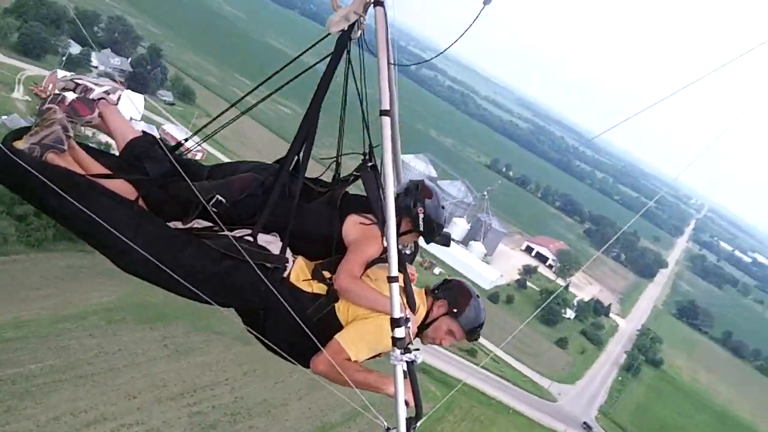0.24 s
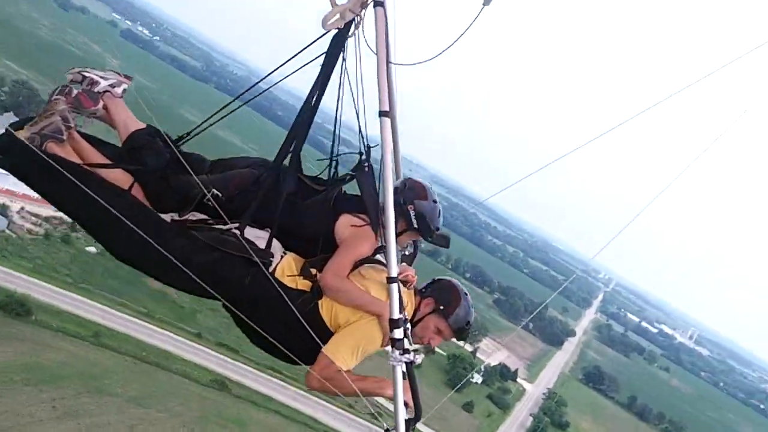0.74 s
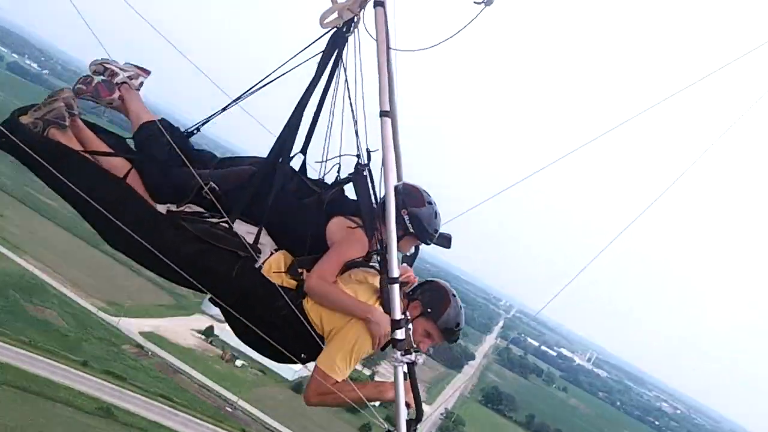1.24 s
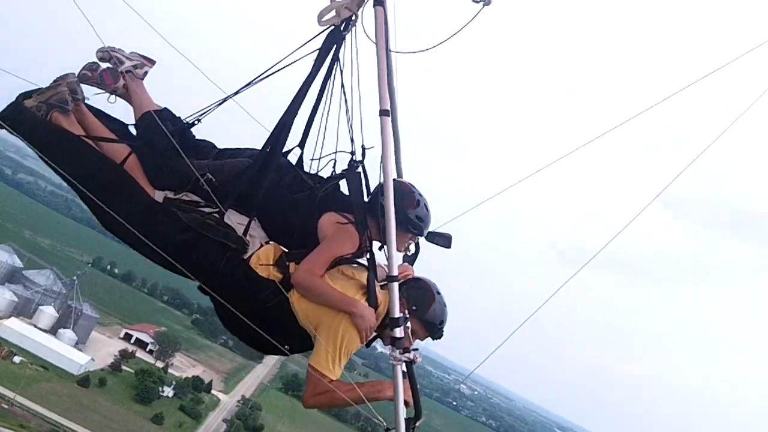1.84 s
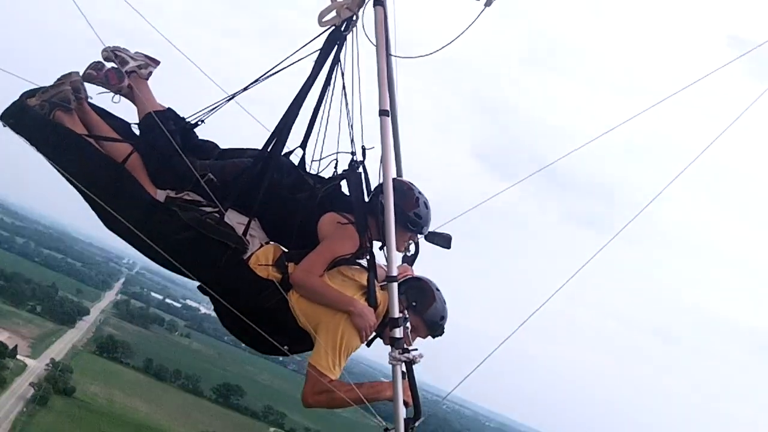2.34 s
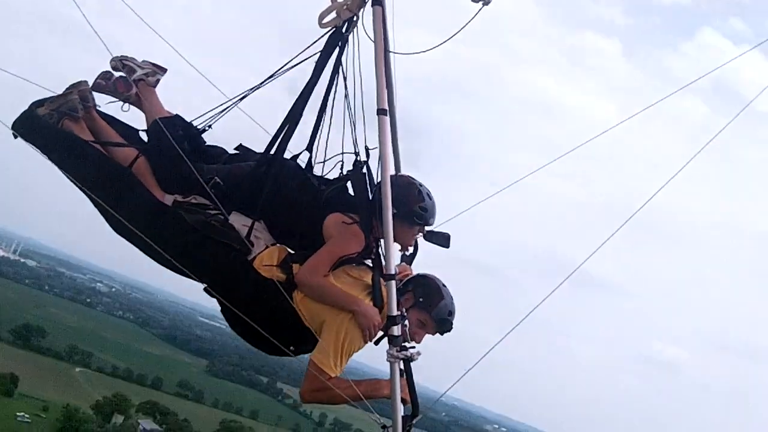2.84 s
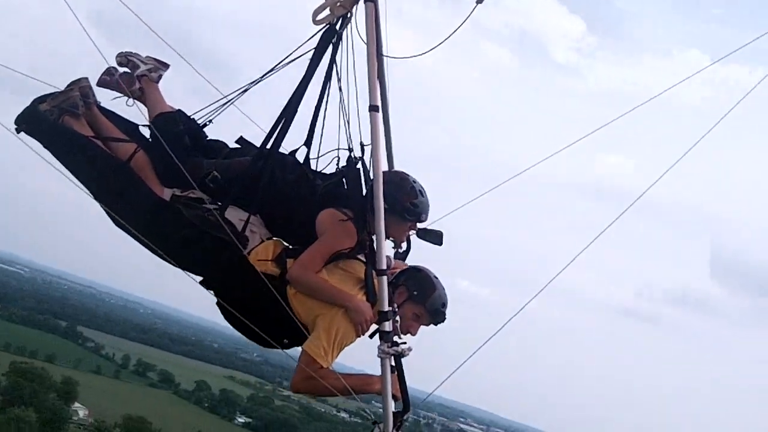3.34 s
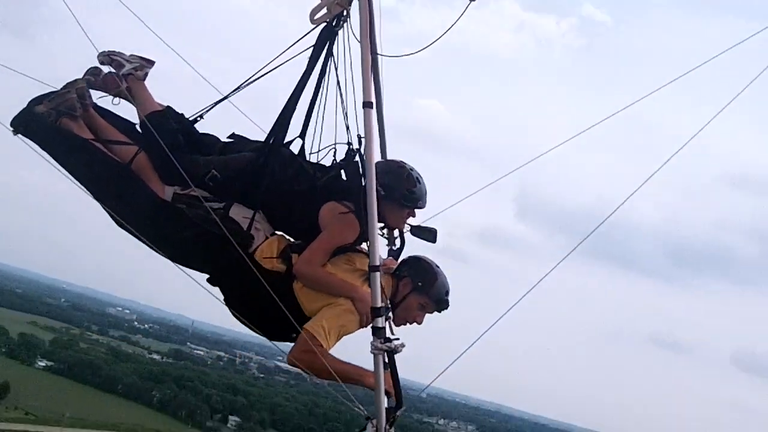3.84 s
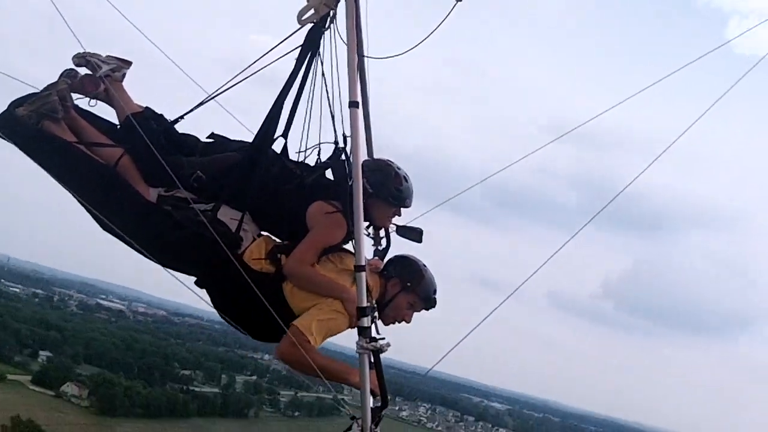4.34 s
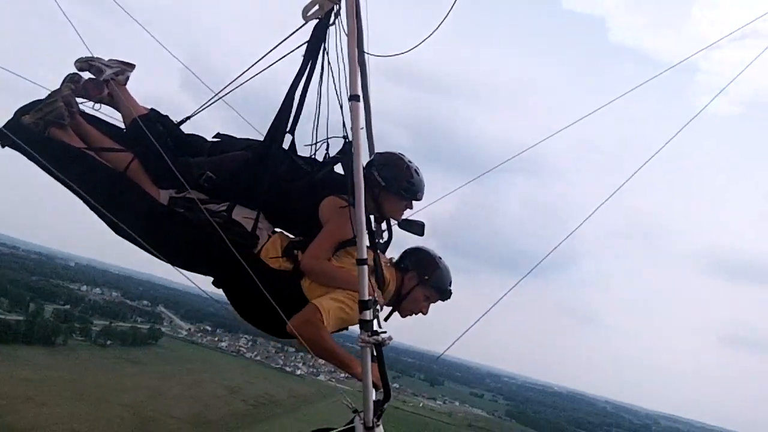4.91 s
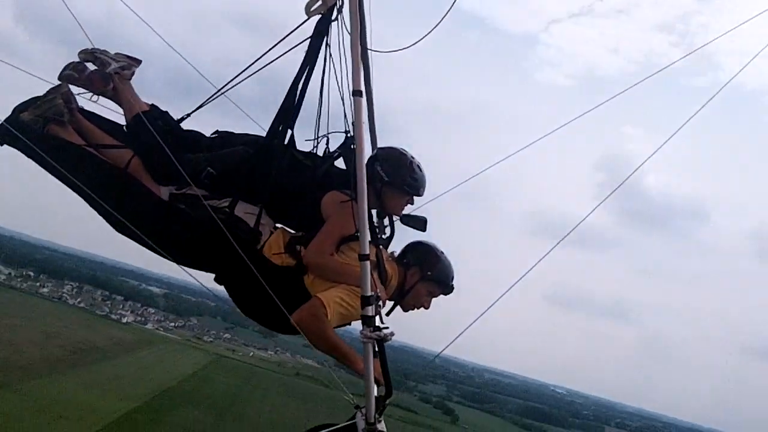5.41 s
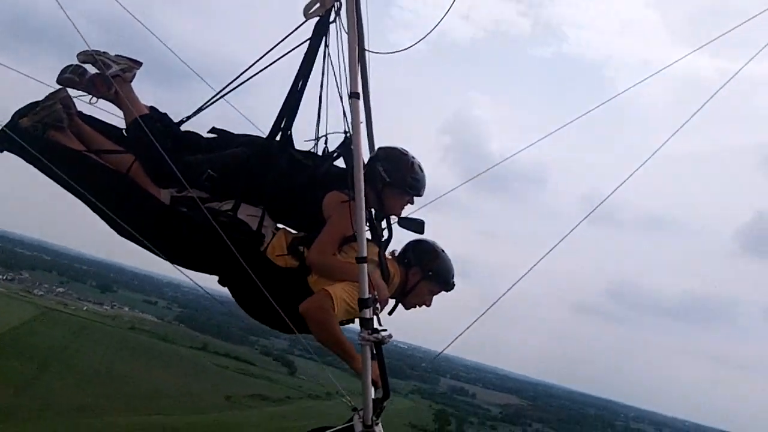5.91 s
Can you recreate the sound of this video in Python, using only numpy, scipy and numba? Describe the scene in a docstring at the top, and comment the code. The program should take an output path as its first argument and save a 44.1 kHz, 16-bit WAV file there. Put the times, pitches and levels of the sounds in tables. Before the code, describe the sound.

Loud wind blows directly over the microphone of a camera fixed to a hang glider in flight. For the first 1.6 seconds it is a fairly steady roar and hiss above a low rumble. From about 1.7 to 2.2 seconds the hiss drops away and deep, fluttering buffets swell, with a few very faint ticks. The rush returns at 2.2 seconds, broken by two quick dips, and two tiny hoots of air sit behind it near 2.2 and 2.7 seconds. From about 2.7 to 5 seconds the roar weakens and heavy rumble dominates, with throbbing, irregular low thumps and short, raspy gusts of hiss. The hardest buffets briefly duck the whole sound and carry a faint crackle. From 5 seconds the hiss grows brighter and stronger over slightly softer rumble, dips once near 5.4 seconds, and continues to the end just after 6 seconds.

```python
"""On a hang glider in flight, air streams over the microphone of a fixed camera.
Turbulence is a cascade of eddies: the large ones buffet the diaphragm as rumble, throb and thumps,
the small ones roar and hiss in the port, which is briefly sheltered as the glider rolls out of a turn.
Two brief edge tones, a faint crackle and a few ticks lie behind the wind.
The camera's limiter lowers the gain under the hardest buffets."""
import sys
import numpy as np
from scipy import signal
from scipy.fft import rfft, irfft
from scipy.io import wavfile
from scipy.ndimage import uniform_filter1d
from numba import njit

SR = 44100
rng = np.random.default_rng(int(sys.argv[2]) if len(sys.argv) > 2 else 0)


def master(y):
    """Save y as 16-bit WAV."""
    cut = np.clip(np.atleast_2d(y).T, -1, 1)
    pcm = np.round(cut * 32767)  # scale
    wavfile.write(sys.argv[1], SR, pcm.astype(np.int16))


N = 272097

# Strength of the large eddies, growing after the turn: t/s, rumble level/dB, flutter level/dB
BUFFET_LEVELS = [(0, -27, -25), (0.5, -30, -27.5), (0.9, -31, -24), (1.55, -31.5, -34), (1.8, -22, -17.5),
                 (2.1, -21, -18.5), (2.3, -26, -31), (2.8, -17.5, -21.5), (3.25, -20.5, -22.5),
                 (3.9, -20.5, -27.5), (4.2, -20.5, -22.5), (4.8, -21, -26.5), (5.2, -24.5, -33.5),
                 (6.17, -22, -34.5)]
# Spectra of their three bands: f/Hz, relative level/dB
RUMBLE_SPECTRUM = [(8, -11.5), (18, -6.5), (30, -1.5), (42, 3.5), (56, -2), (72, -10), (100, -30)]
FLUTTER_SPECTRUM = [(30, -28), (50, -9), (62, 0), (85, -1), (105, 0), (135, -10), (200, -21)]
BURBLE_SPECTRUM = [(60, -21.5), (95, 1), (120, -1.5), (160, -4), (210, -9), (280, -17.5)]

def buffeting(rumble_trim_db=-1.03, flutter_trim_db=-3, burble_db=-31):
    """Turbulent pressure fluctuation: large eddies load the diaphragm, more slowly as they grow."""
    rumble_db, flutter_db = curves(BUFFET_LEVELS)
    throb_db = 1.5 * walk(hz=10)
    corner_hz = 151 * 2 ** ((rumble_db.min() - rumble_db) / 13)  # an octave down per 13 dB of rumble
    rumble = steady(colour(rng.standard_normal(N), RUMBLE_SPECTRUM), span_s=0.14)
    flutter = colour(rng.standard_normal(N), FLUTTER_SPECTRUM)
    flutter = steady(lowpass(flutter, corner_hz), span_s=0.042)
    burble = steady(colour(rng.standard_normal(N), BURBLE_SPECTRUM), span_s=0.37)
    deep = rumble * undb(rumble_db + rumble_trim_db) + flutter * undb(flutter_db + flutter_trim_db)
    return deep * undb(throb_db) + burble * undb(burble_db)


# Spells of nearly periodic shedding: t/s, half length/s, f/Hz, level/dB
SHEDDING_SPELLS = [(2.792, 0.21, 56.4, -17), (3.093, 0.038, 67.7, -17), (4.13, 0.1, 63.9, -16),
                   (4.473, 0.041, 66.1, -14), (4.77, 0.03, 64, -14.5)]
# Harmonics 2 and 3, which sharpen the crests: relative level/dB
SHEDDING_OVERTONES = [-13.5, -20]

def vortex_shedding(pressure):
    """Vortex shedding: eddies leave the camera body in a loose rhythm that displaces the rumble."""
    unevenness = 2 ** (.24 * walk(hz=44.9))
    strength = undb(2.0 * walk(hz=40))
    for s, half_s, hz, db in SHEDDING_SPELLS:
        spell = bell(s, half_s)
        phase = 2 * np.pi * np.cumsum(hz * unevenness) / SR
        overtones = sum(undb(level) * np.cos(k * phase) for k, level in enumerate(SHEDDING_OVERTONES, 2))
        throb = strength * (np.cos(phase) + overtones)
        pressure = pressure * (1 - .5 * spell) + undb(db) * spell * throb
    return pressure


# Single strong vortices: t/s, signed peak pressure/full scale, half width/s
VORTEX_PULSES = [(0.883, -0.18, 0.0033), (0.927, -0.15, 0.0031), (1.797, 0.39, 0.0036),
                 (1.889, -0.27, 0.004), (1.934, -0.42, 0.0043), (2.136, 0.31, 0.0034),
                 (2.313, 0.23, 0.0034), (2.658, -0.32, 0.0035), (2.88, -0.26, 0.0036),
                 (2.973, 0.24, 0.0048), (3.054, 0.24, 0.0045), (3.26, 0.28, 0.0043), (3.345, 0.28, 0.0045),
                 (3.513, 0.36, 0.0063), (3.729, 0.34, 0.0033), (3.854, 0.34, 0.0048), (3.895, 0.48, 0.0048),
                 (4.288, 0.41, 0.005), (4.64, 0.32, 0.0051), (4.949, -0.31, 0.0036), (5.005, 0.17, 0.0041),
                 (5.355, 0.22, 0.0084), (5.454, 0.25, 0.0022), (5.638, 0.31, 0.006)]

def vortex_thumps(pressure):
    """Pressure transient: a vortex sweeps other eddies aside, one peak between two opposite swings."""
    t = np.arange(N) / SR
    for s, peak, half_s in VORTEX_PULSES:
        u = (t - s) / half_s
        pulse = peak * (1 - u ** 2) * np.exp(-u ** 2 / 2)
        pressure = pressure * (1 - bell(s, 2 * half_s)) + pulse
    return pressure


# Flow over the port, sheltered from 1.65 to 2.15 s: t/s, roar level/dB, hiss level/dB, spray level/dB
FLOW_LEVELS = [(0, -31.5, -27, -44), (0.9, -27.5, -29, -49), (1.2, -28, -27, -49), (1.6, -26.5, -29.5, -52),
               (1.645, -29, -30, -58), (1.658, -31, -42, -66), (1.845, -31.5, -36.5, -67),
               (1.872, -34, -54, -63.5), (2.14, -35, -57, -63), (2.175, -28.5, -31.5, -59.5),
               (2.45, -27.5, -30, -51.5), (2.52, -34, -32.5, -58), (2.64, -33, -33, -64),
               (2.9, -38.5, -37, -60), (3.6, -42, -37.5, -61), (4.75, -40, -35, -52.5),
               (5.03, -34.5, -29, -45.5), (5.8, -34, -31.5, -45.5), (6.17, -36, -32, -46)]
# Spectra of its three bands, spray being the finest hiss: f/Hz, relative level/dB
ROAR_SPECTRUM = [(80, -28), (170, -6), (280, 2.5), (450, 0.5), (800, 0.5), (1500, -3.5), (3000, -2.5),
                 (4500, -18), (6800, -47.5)]
HISS_SPECTRUM = [(400, -24), (1000, -7), (1500, -4), (2100, -2.5), (2900, -2), (3400, -2.5), (4000, -5.5),
                 (4700, -12.5), (6000, -22)]
SPRAY_SPECTRUM = [(2500, -20), (3800, -3), (4500, 0), (5200, -4), (6200, -10.5), (7050, -16), (7600, -40),
                  (8100, -42), (8700, -30), (11200, -32.5), (12000, -48)]

def port_rush(roar_trim_db=0.15, hiss_trim_db=-0.73, spray_trim_db=0.9):
    """Flow separation: small eddies tear off the port's rim in bursts that drive all three bands."""
    roar_db, hiss_db, spray_db = curves(FLOW_LEVELS) + gusts()
    bursts = undb(1.27 * walk(hz=190) + 0.81 * walk(hz=24))
    # Slower flow sheds larger eddies: the roar dulls as it weakens, the hiss as the spray fades.
    roar_hz = np.clip(1000 * 2 ** ((roar_db + 33.5) / 10), 700, 2000)
    hiss_hz = np.clip(3710 * 2 ** ((spray_db - hiss_db + 17.0) / 9.5), 1800, 5000)
    roar = colour(eddies(bursts, grain_db=1.2), ROAR_SPECTRUM)
    roar = steady(lowpass(roar, roar_hz), span_s=0.04)
    hiss = colour(eddies(bursts, grain_db=2.5), HISS_SPECTRUM)
    hiss = steady(lowpass(hiss, hiss_hz), span_s=0.068)
    spray = steady(colour(eddies(bursts, grain_db=3.0), SPRAY_SPECTRUM), span_s=0.15)
    return (roar * undb(roar_db + roar_trim_db)
            + (hiss + port_rasp(bursts)) * undb(hiss_db + hiss_trim_db)
            + spray * undb(spray_db + spray_trim_db))


def port_rasp(bursts, turn_db=-15, level_flight_db=-6, levelled_s=3.2):
    """Cavity resonance: bursts ring the port, most strongly when level flight sends air squarely over."""
    centre_hz = 2720 * (1 + 0.087 * walk(hz=9.5))
    drive = colour(eddies(bursts, grain_db=5.0), HISS_SPECTRUM)
    ring = steady(resonance(drive, centre_hz, width_hz=690.0), span_s=0.06)
    levelled = .5 + .5 * np.tanh((np.arange(N) / SR - levelled_s) / 0.43)
    return ring * undb(turn_db + (level_flight_db - turn_db) * levelled)


# Gusts (+) and lulls (-): t/s, half length/s, level change/dB
GUST_SWELLS = [(0.035, .02, -2), (0.062, 0.013, 3), (0.147, 0.0073, -4), (0.21, .018, 2),
               (0.362, 0.013, -2), (0.412, .016, 1.5), (0.59, .018, 2), (0.745, 0.019, -2.5),
               (0.911, 0.037, -3), (1.42, 0.028, 0.5), (1.5, 0.034, 1.5), (2.215, 0.02, 0.5),
               (2.246, .009, 1.5), (2.257, 0.012, -9), (2.337, 0.024, -6), (2.687, .015, -2),
               (2.947, 0.015, -4), (3.073, 0.044, 3.5), (3.161, 0.022, 3.5), (3.312, 0.065, 4),
               (3.5, 0.026, 4.5), (3.657, 0.021, 7), (3.844, 0.085, 5.5), (3.905, 0.034, -2),
               (4.054, 0.042, 5), (4.222, 0.01, 3.5), (4.283, 0.015, 4), (4.403, 0.044, 7),
               (4.497, 0.023, -3.5), (4.565, 0.061, 4.5), (4.665, 0.025, -0.5), (4.894, 0.036, 1),
               (5.083, 0.04, 1), (5.136, 0.022, -3.5), (5.22, 0.032, 1.5), (5.303, 0.014, 1.5),
               (5.37, 0.037, -7), (5.475, 0.012, -2), (5.51, 0.029, 1), (5.595, 0.045, 2),
               (5.663, 0.029, -3), (5.726, 0.024, 3), (5.922, 0.047, 2), (6.093, 0.023, -2),
               (6.157, .02, 2.5)]

def gusts():
    """Amplitude modulation, in dB: the rush swells, sways, and tears as the flow leaves the port."""
    tearing = 1.5 * bell(2.05, half_s=0.31) * walk(hz=70)
    swells = sum(db * bell(s, half_s) for s, half_s, db in GUST_SWELLS)
    sway = 0.26 * walk(hz=27)
    return swells + sway + tearing


# Hoots of air at an edge: t/s, half length/s, f/Hz, level/dB
EDGE_TONES = [(2.244, 0.0038, 417, -23.5), (2.722, 0.014, 427.6, -30)]
# Their harmonics 1 to 5: relative level/dB
EDGE_HARMONICS = [4, 0, -11, -6, -17]

def edge_tones():
    """Edge tone: vortices shed in step for an instant and give a wavering harmonic hoot."""
    out = 0
    waver = 1 + 0.0126 * walk(hz=62)
    for s, half_s, hz, db in EDGE_TONES:
        phase = 2 * np.pi * np.cumsum(hz * waver) / SR
        tone = sum(undb(level) * np.sin(k * phase) for k, level in enumerate(EDGE_HARMONICS, 1))
        out = out + undb(db) * bell(s, half_s) * tone
    return out


# Spectrum of the strained diaphragm's noise: f/Hz, relative level/dB
CRACKLE_SPECTRUM = [(1000, 2), (5000, 0), (8000, -8), (9500, -3), (11300, -4), (12700, -11), (13200, -28)]

def diaphragm_crackle(pressure, db, limit_pressure=0.26):
    """Nonlinearity: the diaphragm fizzes under strain and spits near the end of its travel."""
    strain = np.minimum(np.abs(pressure) / limit_pressure, 1)
    grains = colour(eddies(1, grain_db=1.8), CRACKLE_SPECTRUM)
    fizz = .8 * uniform_filter1d(strain ** 2, size=4500)
    spits = uniform_filter1d(strain ** 4, size=240)
    return undb(db) * (fizz + spits) * grains


# Ticks and a short rustle: t/s, half length/s, level/dB
LULL_TICKS = [(1.825, .002, -64), (1.936, .004, -63), (2.09, .004, -68), (2.11, .03, -77),
              (2.138, .003, -53.5)]
# Their spectrum: f/Hz, relative level/dB
TICK_SPECTRUM = [(1000, -6), (5000, -1), (9000, -4), (14000, -4), (15500, -10)]

def ticks():
    """Release from masking: faint, crisp noise bursts come through while the port is sheltered."""
    grains = colour(eddies(1, grain_db=4), TICK_SPECTRUM)
    return grains * sum(undb(db) * bell(s, half_s) for s, half_s, db in LULL_TICKS)


def eddies(bursts, grain_db):
    """Intermittency: turbulence comes in bursts, and each burst breaks into finer grains."""
    return rng.standard_normal(N) * bursts * undb(grain_db * walk(hz=910))


def undb(db):
    """Decibel law: level to amplitude ratio."""
    return 10 ** (np.asarray(db) / 20)


def bell(s, half_s):
    """Gaussian window of height 1, centred on s."""
    return np.exp(-((np.arange(N) / SR - s) / half_s) ** 2)


def curves(table):
    """Linear interpolation of each column over time, one value a sample."""
    s, *columns = np.transpose(table)
    return np.array([np.interp(np.arange(N) / SR, s, column) for column in columns])


def colour(x, spectrum):
    """Spectral shaping by (f/Hz, level/dB) points, falling steeply above the last; rms 1."""
    hz, db = np.transpose(spectrum)
    f = np.maximum(np.arange(N // 2 + 1) * SR / N, 1)
    gain = undb(np.interp(np.log(f), np.log(hz), db))
    skirt = np.minimum(hz[-1] / f, 1) ** 10
    y = irfft(rfft(x) * gain * skirt, N)
    return y / y.std()


def walk(hz):
    """Low-pass noise: a random wander of spread 1, with little motion faster than hz."""
    f = np.arange(N // 2 + 1) * SR / N
    y = irfft(rfft(rng.standard_normal(N)) / (1 + (f / hz) ** 2), N)
    return y / y.std()


def steady(x, span_s):
    """Normalisation by the running rms evens out swells longer than the span."""
    size = max(int(span_s * SR), 2)
    return x / np.sqrt(uniform_filter1d(uniform_filter1d(x ** 2, size), size))


@njit
def lowpass(x, hz):
    """Two-pole state-variable low-pass with a moving corner."""
    y, band_state, low_state = np.empty(len(x)), 0., 0.
    for i in range(len(x)):
        g = np.tan(np.pi * hz[i] / SR)
        band = (band_state + g * (x[i] - low_state)) / (1 + g * (g + np.sqrt(2.)))
        y[i] = low_state + g * band
        band_state, low_state = 2 * band - band_state, 2 * y[i] - low_state
    return y


@njit
def resonance(x, hz, width_hz):
    """Damped resonator: a state-variable band-pass with a moving centre."""
    y, band_state, low_state = np.empty(len(x)), 0., 0.
    for i in range(len(x)):
        g, damping = np.tan(np.pi * hz[i] / SR), width_hz / hz[i]
        band = (band_state + g * (x[i] - low_state)) / (1 + g * (g + damping))
        y[i] = damping * band
        band_state, low_state = 2 * band - band_state, low_state + 2 * g * band
    return y


@njit
def follow(x, attack_s, release_s):
    """Peak detection: an envelope that rises fast and falls slowly."""
    y, envelope = np.empty(len(x)), 0.
    for i in range(len(x)):
        lag_s = attack_s if abs(x[i]) > envelope else release_s
        envelope += (abs(x[i]) - envelope) / (SR * lag_s)
        y[i] = envelope
    return y


def limiter(x, threshold_db, slope):
    """Dynamic compression: the gain falls after each peak over the threshold."""
    envelope = follow(x, attack_s=0.0015, release_s=0.13)
    excess = np.maximum(envelope / undb(threshold_db), 1)
    return x / excess ** slope


def scene():
    """Superposition: all sources add at the one microphone port."""
    pressure = vortex_thumps(vortex_shedding(buffeting()))
    return (pressure + diaphragm_crackle(pressure, db=-55) + ticks() + port_rush() + edge_tones())[None]


def record(dry):
    """Compression and band limiting: hard buffets duck the whole sound, and the top is cut steeply."""
    limited = limiter(dry[0] * undb(0.07), threshold_db=-13.5, slope=0.76)
    top_hz = 15500
    return signal.sosfilt(signal.ellip(10, .2, 70, top_hz, fs=SR, output="sos"), limited)[None]


dry = scene()
out = record(dry)
master(out)
```